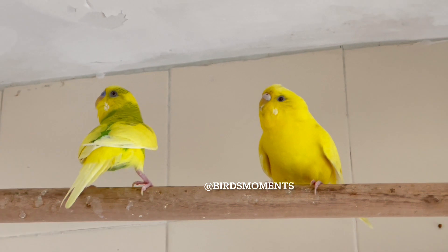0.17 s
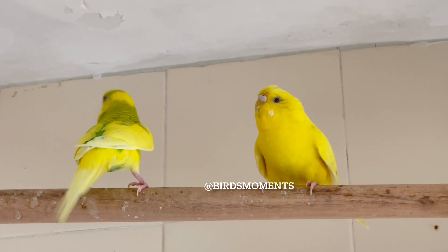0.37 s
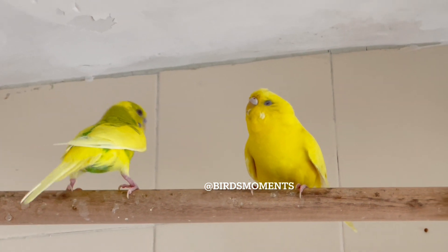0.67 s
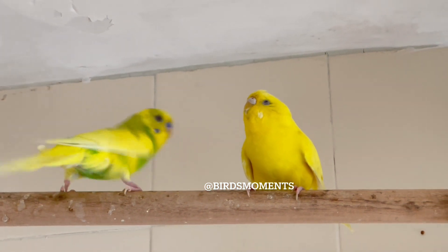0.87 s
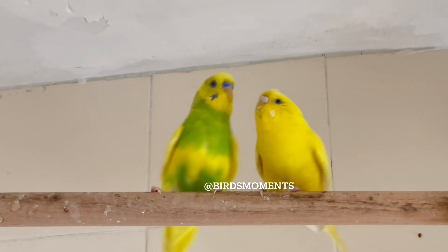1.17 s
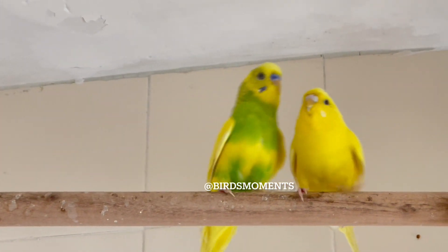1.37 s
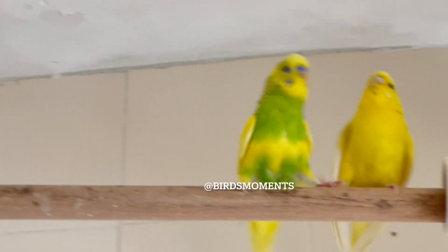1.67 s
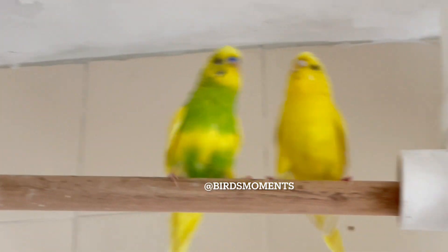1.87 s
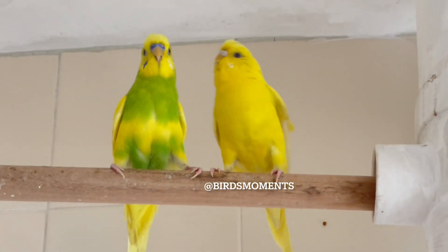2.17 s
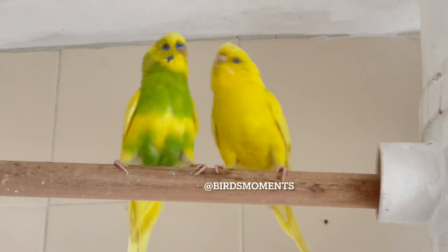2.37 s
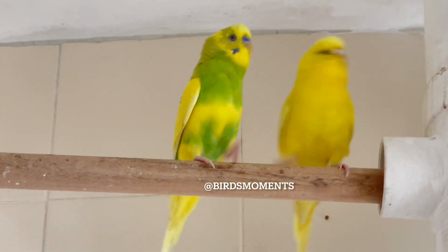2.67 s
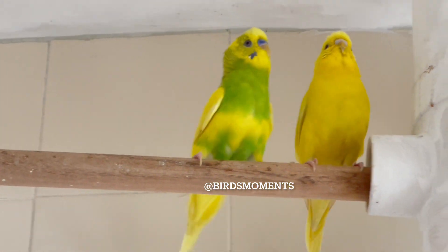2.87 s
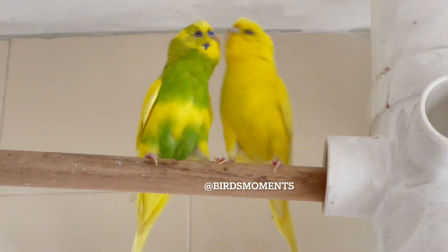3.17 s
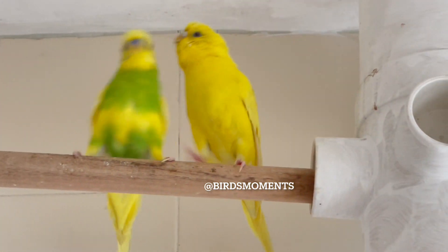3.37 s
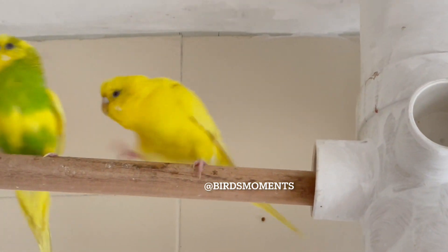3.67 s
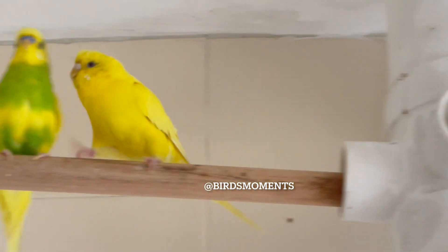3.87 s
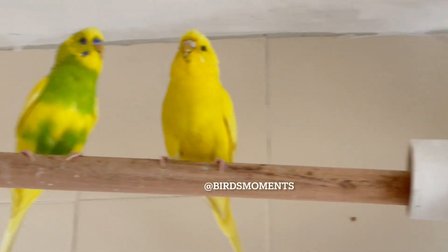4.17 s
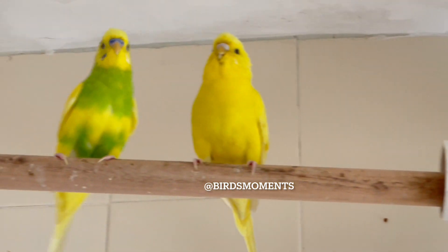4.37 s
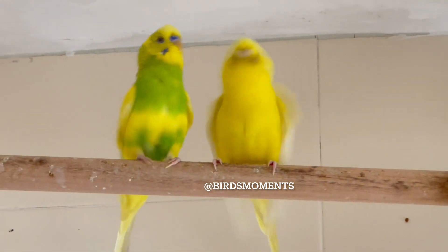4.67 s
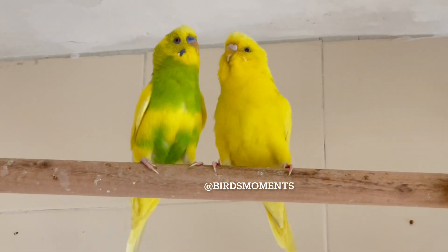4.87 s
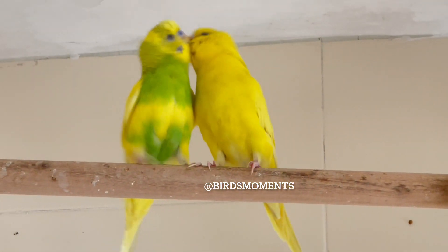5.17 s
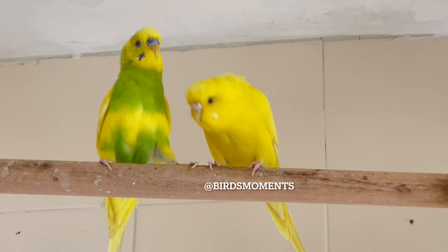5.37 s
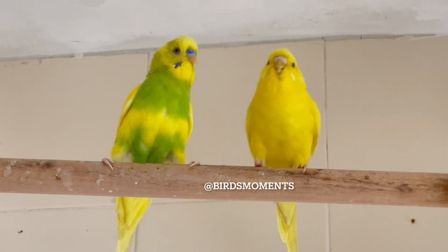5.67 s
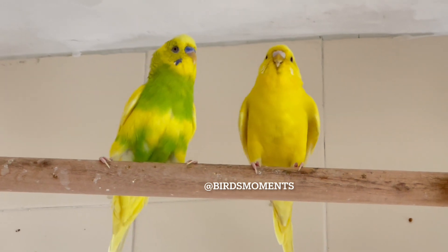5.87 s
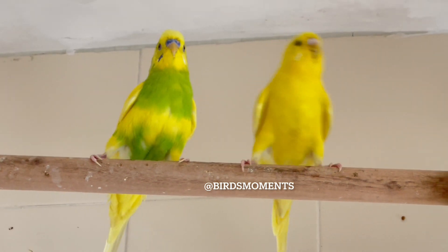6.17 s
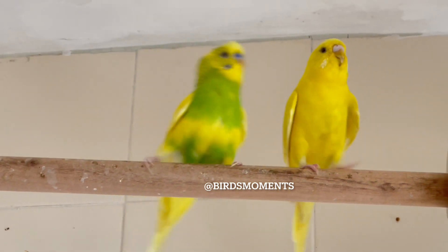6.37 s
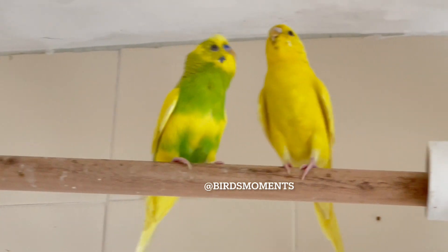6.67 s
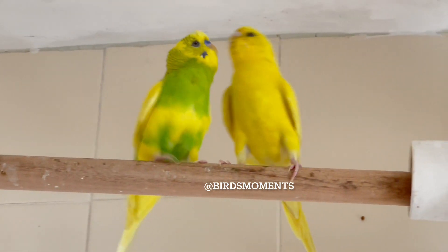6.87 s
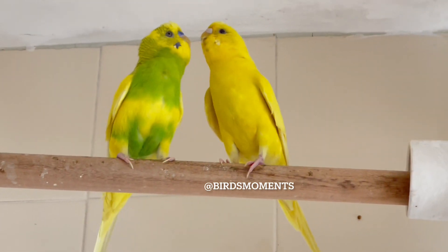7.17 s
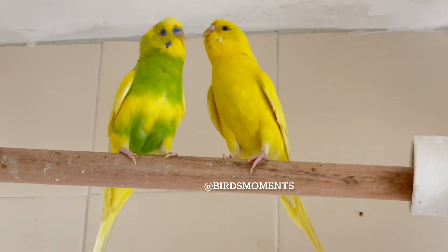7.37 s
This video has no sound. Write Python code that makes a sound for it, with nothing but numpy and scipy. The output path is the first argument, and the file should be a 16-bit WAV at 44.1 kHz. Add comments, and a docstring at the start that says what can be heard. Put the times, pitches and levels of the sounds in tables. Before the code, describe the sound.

Two budgies chatter close to the microphone in a bare, echoing tiled room, over soft room noise and a faint wavering low hum. From 0 to 0.85 s it is nearly silent, with barely perceptible distant chirping and warbling. From 0.9 to 1.5 s a run of dry, woody clucks comes about every tenth of a second. Around 1.55-1.95 s there is a low falling yelp, then quick chirps and a buzz. Harsh, pulsing squawks strike at 2.25 and 2.43 s. From 2.7 to 3.7 s tiny gliding chirps and clucks tumble quietly, with faint feather rustle. Brighter trills come at 3.8 s, a swooping nasal call at 4.0 s, and fast chatter at 4.35-5.0 s. The loudest, very short squawk hits at 5.1 s, echoed weakly at 5.2. After a pause, a cluck at 5.6, bright trilled chirps near 6.05, low husky warbling at 6.4-6.7, then scattered chirps and a buzz until 7.5 s.

```python
"""In a bare tiled room, two budgerigars chatter on a perch close to the microphones.
Chirps, yelps, trills, buzzes, drawls and warbles are partials that follow a gliding pitch, coloured by a throat.
Rasping squawks are such tones broken into pulses; clucks are short bursts ringing windpipe and beak.
Feathers rustle as shaped noise and feet knock a ringing perch. Dense wall reflections draw every note
into a tail, over a low wavering hum in soft room noise."""
import sys
import numpy as np
from scipy import signal
from scipy.fft import rfft, irfft, next_fast_len
from scipy.io import wavfile

SR = 44100
rng = np.random.default_rng(int(sys.argv[2]) if len(sys.argv) > 2 else 0)


def to_wav(sig):
    """Store sig (one row per channel, or 1-D mono) as 16-bit WAV at the path in sys.argv[1].

    Samples outside -1..1 are clipped; the rate is SR.
    """
    pcm = np.clip(np.atleast_2d(sig), -1, 1) * 32767
    pcm = np.round(pcm).astype(np.int16)
    wavfile.write(sys.argv[1], SR, pcm.T)  # frames by channels


N = 332073  # length in samples
EDGE_HZ = 15800  # upper band limit


def syrinx(hz, colour, slope_db, fall_db=3.0, count=10):
    """Harmonic source and filter: membranes give partials, the throat weights them; those past the third fade."""
    k = np.arange(1, count + 1)[:, None]
    weight_db = read(colour, k * hz) + slope_db * np.log2(k) - fall_db * np.maximum(k - 3, 0)
    audible = k * hz < EDGE_HZ
    phase = 2 * np.pi * np.cumsum(hz) / SR
    partials = gain_of(weight_db) * audible * np.sin(k * phase)
    return evened(partials.sum(0))


# A loud note, from which brightness is reckoned: pitch in Hz, level in dB.
REFERENCE_HZ, REFERENCE_DB = 2262, -23
# The overtone slope (dB per octave) falls per octave of pitch and rises per dB of level.
THINNING, BRIGHTEN = 2.9, 0.34
CLEAR = 0.11  # roughness of the clear notes (0-1)


def sing(hz, colour, level_db, rough, slope_db, jitter=0.093, quiver=0.026, shimmer=1.0,
         flutter_hz=560, air_db=-17, air_slope=0.29, taper=0.3):
    """Modulated phonation: roughness shakes pitch and strength; low, loud notes are brighter and airier."""
    size = len(hz)
    slope_db = slope_db - THINNING * np.log2(hz / REFERENCE_HZ) + BRIGHTEN * (level_db - REFERENCE_DB)
    hz = hz * np.exp((quiver + jitter * rough) * wander(flutter_hz, size))
    breath = gain_of(air_db + air_slope * slope_db) * hiss(colour, size)
    tone = syrinx(hz, colour, slope_db) + breath
    flutter = np.exp(shimmer * rough * np.tanh(wander(flutter_hz, size)))
    pressure = signal.windows.tukey(size, taper) * flutter
    return gain_of(level_db) * evened(tone * pressure)


SETTLE = 0.89  # time constant of a glide, as a share of the note's length


def slide(length, middle_hz, octaves):
    """Exponential relaxation of pitch: a short note slides fast at first, then more slowly."""
    way = np.exp(-np.linspace(0, 1, int(length * SR)) / SETTLE)
    travelled = (way[len(way) // 2] - way) / (1 - way[-1])
    return middle_hz * 2 ** (octaves * travelled)


# Resonance of the throat. Each row: frequency in Hz, gain in dB.
THROAT = [(400, -30), (1000, -11.5), (1600, -4.5), (2900, 3.5), (3800, -5), (4800, -7.5), (6300, -7.5),
          (8800, -3), (10200, -13.5), (12300, -16), (13600, -69)]
# Thin, nearly pure whistles; the rows at 6.953 and 6.956 are bright overtones of a yelp.
# Each row: start in seconds, length in seconds, pitch at the middle in Hz, glide in octaves, level in dB.
CHIRPS = [ (.298, 0.097, 4520, -.02, -78.5), (.465, 0.13, 2820, -0.076, -83),
          (1.842, 0.029, 3314, -0.27, -34.5), (1.868, 0.069, 2584, -0.13, -29.5),
          (2.67, .08, 1888, 0.17, -42.5), (2.818, 0.023, 1955, -.75, -32), (2.832, 0.011, 2785, -.4, -36),
          (2.961, 0.013, 3060, 0.64, -37.5), (3.04, 0.02, 3190, -.06, -36.5),
          (3.055, 0.028, 2250, -0.67, -39), (3.086, 0.021, 1392, 0.24, -43.5),
          (3.124, 0.013, 1380, 0.26, -43), (3.277, 0.037, 2130, -0.67, -37),
          (3.502, 0.041, 1858, 0.53, -39), (3.538, .022, 2524, -0.3, -38.5),
          (3.584, 0.025, 2950, .25, -35.5), (3.625, 0.033, 2570, -.44, -37), (3.671, 0.016, 1870, -.9, -35),
          (3.802, 0.016, 3195, 0.33, -21.5), (4.381, 0.032, 1930, 0.34, -39),
          (4.44, .026, 1972, -0.12, -36.5), (4.594, 0.023, 2664, 0.091, -31),
          (4.817, 0.011, 3770, -0.44, -39), (4.826, 0.02, 2286, 0.35, -37.5),
          (4.84, 0.013, 1992, -0.4, -37.5), (4.853, 0.05, 2475, -0.5, -32.5), (4.897, 0.025, 3263, .6, -29),
          (4.925, 0.021, 3068, -0.049, -23.5), (4.964, .035, 2626, -.05, -30),
          (4.987, .023, 1830, -0.4, -35.5), (5.814, 0.021, 3096, 0.16, -36.5),
          (5.902, .018, 2112, -0.323, -39.5), (5.939, 0.011, 1480, -0.41, -41.5),
          (6.022, 0.0344, 2850, -0.25, -27.5), (6.129, 0.013, 3410, .03, -31.5),
          (6.809, 0.013, 3625, -0.46, -39), (6.855, 0.026, 2510, -0.41, -39.5),
          (6.901, .021, 3354, -.25, -36.5), (6.953, 0.011, 4214, -0.24, -33),
          (6.956, 0.0113, 6240, -0.16, -38.5), (7.383, 0.015, 3430, 0.31, -38.5),
          (7.403, .034, 1713, -0.84, -38.5), (7.43, 0.048, 2436, 0.04, -39)]


def chirp(length, hz, octaves, level_db):
    """Steep spectral slope: with weak overtones, the note is a clean whistle."""
    return sing(slide(length, hz, octaves), THROAT, level_db, rough=CLEAR, slope_db=-13.0)


# Colour of the throat in nasal notes. Each row: frequency in Hz, gain in dB.
NASAL = [(400, -23.5), (1000, -9), (1600, -8), (2200, -3), (3000, 6.5), (3800, 3), (4800, -11.5),
         (6300, -9.5), (8800, -2.5), (12300, -15.5), (13600, -69)]
# Nasal notes. Each row: start in seconds, length in seconds, pitch at the middle in Hz,
# glide in octaves, level in dB.
YELPS = [ (1.549, .075, 1138, -.62, -36), (1.782, 0.022, 1428, -0.43, -37), (2.797, 0.026, 2726, 0.35, -31),
         (3.742, 0.021, 1910, 0.21, -32.5), (4.347, 0.025, 1541, -.15, -42.5),
         (6.001, 0.016, 1895, -.14, -38.5), (6.06, 0.0072, 1860, -0.115, -25.5),
         (6.924, 0.018, 2575, -0.074, -36), (6.949, 0.02, 2110, -.2, -39.5)]


def yelp(length, hz, octaves, level_db):
    """Gentle spectral slope: with strong overtones, the note is nasal."""
    return sing(slide(length, hz, octaves), NASAL, level_db, rough=CLEAR, slope_db=-4)


# Trilled notes. Each row: start in seconds, length in seconds, pitch at the middle in Hz,
# glide in octaves, level in dB.
TRILLS = [(3.763, 0.036, 2784, 0.036, -25), (3.827, 0.081, 2714, -0.13, -27.5),
          (5.753, 0.058, 1887, 0.25, -41.5), (5.842, 0.048, 2885, 0.085, -38),
          (6.069, .056, 2920, .05, -23), (6.786, 0.052, 1762, 0.41, -45)]
TRILL_PER_S = 100  # mean number of swings a second


def trill(length, hz, octaves, level_db, sweep=0.11, throb=0.66, unsteady=0.17):
    """Joint frequency and amplitude modulation: a whistle swings quickly, loudest at the foot of each swing."""
    pitch = slide(length, hz, octaves)
    rate = TRILL_PER_S * (1 + unsteady * wander(TRILL_PER_S, len(pitch)))
    swing = -np.sin(2 * np.pi * np.cumsum(rate) / SR)
    note = sing(pitch * 2 ** (sweep * swing), THROAT, level_db, rough=0.327, slope_db=-11.0)
    return note * evened(np.exp(-throb * swing))


# Hoarse notes. Each row: start in seconds, length in seconds, pitch at the middle in Hz,
# glide in octaves, level in dB.
BUZZES = [ (1.797, 0.052, 2244, -0.49, -36), (1.915, 0.047, 1292, 0.17, -44.5),
          (2.849, 0.036, 1950, -.3, -33.5), (3.14, 0.062, 1847, -0.093, -40),
          (4.104, .013, 3800, 0.11, -25.5), (7.101, 0.043, 3878, 0.041, -30)]


def buzz(length, hz, octaves, level_db):
    """Random frequency modulation: a whistle shaken so hard that it smears into a band."""
    return sing(slide(length, hz, octaves), THROAT, level_db, rough=0.707, slope_db=-11.0)


# Longer nasal calls, one list of points a call. Each row: time in seconds, pitch in Hz,
# level in dB before the common trim.
DRAWLS = [
    [(4.004, 1749, -21.5), (4.02, 1977, -20.5), (4.024, 1848, -21.5), (4.038, 1432, -27),
     (4.052, 1537, -24), (4.064, 1932, -33), (4.068, 1943, -24.5), (4.098, 2413, -25.5), (4.118, 2270, -30),
     (4.13, 2310, -20)],
    [(4.482, 990, -28.5), (4.492, 1130, -27.5), (4.511, 1247, -28), (4.518, 1518, -28),
     (4.545, 1402, -29.5)],
    [(4.592, 1345, -33), (4.614, 1362, -40), (4.626, 1675, -32), (4.65, 1451, -32), (4.68, 1384, -32.5)],
]


def drawls(trim_db=-3):
    """Continuous pitch and level contours: long nasal calls swoop along curves of their own."""
    track = np.zeros(N)
    for curve in DRAWLS:
        s, hz, db = np.transpose(curve)
        t = np.arange(s[0], s[-1], 1 / SR)
        pitch = np.interp(t, s, hz)
        level_db = np.interp(t, s, db) + trim_db
        add(track, s[0], sing(pitch, NASAL, level_db, rough=CLEAR, slope_db=-4.0, taper=0.1))
    return track


# Stretches of soft, low warbling. Each row: start in seconds, end in seconds, central pitch in Hz,
# central level in dB, overtone slope in dB per octave for that loud reference note.
WARBLES = [(0.253, .8, 1200, -69.5, -18), (6.426, 6.72, 1166, -49, -5.5)]
WARBLE_PER_S, WARBLE_NOTE_S = 20, 0.0328  # mean pace and length of its notes
WARBLE_SPREAD, WARBLE_GLIDE = 0.0788, 0.306  # scatter of their pitch and glide, octaves


def warble(unsteady=0.17, uneven_db=1.5):
    """Random note sequence: husky little notes at a loose pace, with chance pitch, glide and strength."""
    track = np.zeros(N)
    for start, end, hz, level_db, slope_db in WARBLES:
        for s in np.arange(start, end, 1 / WARBLE_PER_S):
            late, shift, glide, effort = rng.standard_normal(4)
            pitch = slide(WARBLE_NOTE_S, hz * 2 ** (WARBLE_SPREAD * shift), WARBLE_GLIDE * glide)
            note = sing(pitch, THROAT, level_db + uneven_db * effort, rough=0.34, slope_db=slope_db)
            add(track, s + unsteady * late / WARBLE_PER_S, note)
    return track


# Colour of the wide-open beak. Each row: frequency in Hz, gain in dB.
GAPE = [(500, -50), (1050, -34), (1450, -14.5), (3000, -7), (4500, -4), (6100, 0.5), (7800, -3),
        (9200, -4.5), (12200, -17.5), (13700, -46.5)]
# Rasping squawks, loud to faint, one with a weaker repeat just after it. Each row: start in seconds,
# length in seconds, pitch at the start in Hz, pitch it tends to in Hz, level in dB,
# rasp pulses a second before they quicken.
SQUAWKS = [(2.248, 0.1, 2665, 2922, -22.5, 200.8), (2.428, 0.069, 2752, 3310, -19.5, 209.5),
           (5.094, 0.029, 2826, 3203, -14, 222.4), (5.19, 0.024, 3007, 3233, -24, 225),
           (7.089, 0.061, 4070, 4150, -45.5, 203)]


def squawk(length, start_hz, top_hz, level_db, pulse_hz, sweep=0.0762, jitter=0.0616, throb=0.77,
           quicken=0.501, air_db=-2, settle=0.2, swell=0.44):
    """Pulsed phonation: quickening pulses merge as they bend the pitch and throb both tone and air."""
    u = np.linspace(0, 1, int(length * SR))
    size = len(u)
    rate = pulse_hz * (1 + quicken * u + 0.22 * wander(pulse_hz, size))
    beat = 2 * np.pi * np.cumsum(rate) / SR
    shake = jitter * wander(680, size) + sweep * np.sin(beat)
    hz = (top_hz + (start_hz - top_hz) * np.exp(-u / settle)) * np.exp(shake)
    onset = np.sin(np.pi / 2 * np.minimum(u / swell, 1))
    pulses = np.exp(-throb * (1 - u) * np.cos(beat))  # shallower towards the end
    pressure = onset * signal.windows.tukey(size, 0.2) * pulses
    tone = syrinx(hz, GAPE, 0) + gain_of(air_db) * hiss(GAPE, size)
    return gain_of(level_db) * evened(tone * pressure)


# Broad colour of a cluck. Each row: frequency in Hz, gain in dB.
BEAK = [(300, -39), (800, -14), (1500, -6), (3200, 3.5), (4600, -1), (6300, 3), (9000, 2), (12300, -7),
        (13600, -59)]
# Short clucks ringing in the room. Each row: start in seconds, level in dB, decay in seconds,
# low resonance in Hz, beak resonance in Hz.
CLUCKS = [ (.886, -38.5, 0.0066, 1258, 1740), (0.979, -30, 0.017, 1370, 2570),
          (1.104, -31, 0.0051, 959, 3760), (1.162, -30, 0.014, 992, 3050),
          (1.236, -26.5, 0.0055, 1056, 3110), (1.283, -28.5, 0.011, 808, 3080),
          (1.359, -28.5, 0.0089, 835, 3400), (1.418, -29, .013, 824, 3350),
          (1.494, -26, 0.0045, 1489, 3000), (2.728, -35.5, 0.0057, 807, 2010),
          (2.953, -35, 0.0084, 1897, 3530), (3.205, -42, 0.025, 1009, 1920),
          (5.561, -27.5, 0.0037, 1172, 4000), (6.363, -36.5, 0.014, 1054, 1587),
          (6.475, -45.5, 0.017, 824, 2300), (6.62, -40, 0.0079, 1102, 1860),
          (6.727, -41.5, 0.0056, 1098, 1730)]
# Treble slope (dB per octave) at full level (dB), and its rise per dB of level.
CLUCK_SLOPE_DB, CLUCK_FULL_DB, CLUCK_BRIGHTEN = -1, -23, 0.38
CLUCK_VOICE_DB, CLUCK_LIFT = -7, 0.25  # voiced part against the air (dB), its rise in log pitch
PIPE_DB, BEAK_DB = 6, 6  # heights of the first windpipe and the beak resonance


def cluck(level_db, decay, low_hz, beak_hz, width_hz=130, beak_width_hz=240, rise=0.52, grain=0.44, size=8192):
    """Excited resonance: rising pulses and grainy air ring windpipe and beak; harder clucks are brighter."""
    t, f = np.arange(size) / SR, np.fft.rfftfreq(size, 1 / SR)
    puff = (1 - np.exp(-t / (rise * decay))) * np.exp(-(t / decay) ** 2 / 2)
    turns = np.cumsum(low_hz * np.exp(CLUCK_LIFT * np.tanh(t / decay - 1 / 2))) / SR
    pulses = evened(sum(np.cos(2 * np.pi * k * turns) for k in range(1, 6)))
    source = evened(gain_of(CLUCK_VOICE_DB) * pulses + rng.standard_normal(size))
    burst = puff * source * np.exp(grain * wander(600, size))

    slope_db = CLUCK_SLOPE_DB + CLUCK_BRIGHTEN * (level_db - CLUCK_FULL_DB)
    tilt_db = slope_db * np.log2((f + 100) / 3000)
    pipe_db = sum(PIPE_DB / np.sqrt(k) / (1 + ((f - k * low_hz) / width_hz) ** 2) for k in range(1, 4))
    beak_db = BEAK_DB / (1 + ((f - beak_hz) / beak_width_hz) ** 2)
    colour = evened(gain_of(read(BEAK, f) + tilt_db + pipe_db + beak_db))
    # minimum phase: the resonances ring on after the burst, never before it
    log_colour = np.log(np.r_[colour, colour[-2:0:-1]])
    causal = np.exp(signal.hilbert(log_colour).conj())[:len(f)]
    return gain_of(level_db) * irfft(rfft(burst) * causal)


# Colour of the feathers. Each row: frequency in Hz, gain in dB.
FEATHERS = [(600, -12), (2500, -3), (6500, -0.5), (9000, -4), (12300, -9.5), (13600, -59)]
# Rustles as the birds shuffle along the perch. Each row: start in seconds, length in seconds, level in dB.
RUSTLES = [(0.845, 0.077, -58.5), (1.582, 0.16, -55), (3.196, 0.2, -59.5), (3.406, 0.2, -62.5)]


def rustle(length, level_db, grain=0.8, grain_hz=150):
    """Friction noise: feathers brush past each other in one uneven swell of hiss."""
    size = int(length * SR)
    swell = signal.windows.tukey(size, 0.7) * np.exp(grain * wander(grain_hz, size))
    return gain_of(level_db) * evened(hiss(FEATHERS, size) * swell)


# Soft knocks as feet shift on the perch. Each row: start in seconds, level in dB.
STEPS = [(7.097, -52), (7.143, -46.5)]
PERCH_HZ, PERCH_T60 = 364, 0.2  # mean pitch of the perch, and its time (s) to fall 60 dB


def step(level_db, size=12000):
    """Damped free vibration: a foot lands and the perch gives a dull, quickly dying knock."""
    t = np.arange(size) / SR
    hz = PERCH_HZ * (1 + 0.081 * wander(125, size))
    ring = np.sin(2 * np.pi * np.cumsum(hz) / SR)
    return gain_of(level_db - 60 * t / PERCH_T60) * ring


# Reverberation of the tiled room. Each row: frequency in Hz, time to fall 60 dB in seconds.
ROOM_T60 = [(500, 0.13), (1200, 1), (2700, 0.62), (7000, 0.59), (12000, 0.44)]


def tail(build=0.0012, early=0.2, early_s=0.041, size=44100):
    """Diffuse reverberation: dense reflections of random sign, stronger early; each band dies at its speed."""
    taps = rng.choice([-1., 1.], size) * (rng.random(size) < 0.1)
    hz, t, z = signal.stft(taps, SR)
    decay = gain_of(-60 * t / read(ROOM_T60, hz)[:, None])
    ring = signal.istft(z * decay, SR)[1][:size]
    t = np.arange(size) / SR
    ring = ring * (1 - np.exp(-t / build)) * (1 + early * np.exp(-t / early_s))
    return ring / np.linalg.norm(ring)


# Stereo width of the reverberation. Each row: frequency in Hz, side over mid in dB.
ROOM_WIDTH = [(1200, 0), (2300, -11.5), (12000, -55)]


def room(x, wet_db):
    """Convolution with a room response: only its lower tones differ much between the ears."""
    mid = x + gain_of(wet_db) * signal.fftconvolve(x, tail())[:N]
    side = gain_of(wet_db) * signal.fftconvolve(x, coloured(tail(), ROOM_WIDTH))[:N]
    return np.array([mid + side, mid - side])


# Lines of the hum. Each row: mean frequency in Hz, level in dB (HUM_SWELL replaces the first row's level).
HUM = [(64.6, -56), (199.2, -62)]
# Swell of the lowest line. Each row: time in seconds, level in dB before the drone trim.
HUM_SWELL = [(0.0, -45), (3.331, -58), (4.23, -44.5), (4.32, -50.5), (5.33, -55.5), (5.66, -45.5),
             (7.53, -52.5)]
# Spectrum of the room noise. Each row: frequency in Hz, relative density in dB.
AIR = [(20, -23), (38, -8.5), (60, 0.5), (130, -3.5), (250, -7), (500, -10), (1200, -17), (2000, -27),
       (4500, -36), (5600, -41.5), (16000, -57)]
AIR_DB = -57  # level of the mid part of the room noise
# Stereo width of the room noise. Each row: frequency in Hz, side over mid in dB.
AIR_WIDTH = [(50, -2.5), (120, -9), (700, -4)]


def background(drone_db=-2.5, waver=0.53, drift_hz=4):
    """Narrow-band tones in broadband noise: a wavering low hum with a higher line, in soft room noise."""
    swell_db = np.interp(np.arange(N) / SR, *np.transpose(HUM_SWELL)) + drone_db
    levels_db = [swell_db] + [db for _, db in HUM[1:]]
    hum = 0
    for (hz, _), db in zip(HUM, levels_db):
        turns = np.cumsum(hz + drift_hz * wander(7.08, N)) / SR
        line = np.sin(2 * np.pi * turns) * (1 + waver * wander(4.5, N))
        hum = hum + gain_of(db) * evened(line)
    mid, side = hiss(AIR, N), coloured(hiss(AIR, N), AIR_WIDTH)
    return hum + gain_of(AIR_DB) * np.array([mid + side, mid - side])


def gain_of(db):
    """Logarithmic level: decibels become an amplitude factor."""
    return 10 ** (np.asarray(db) / 20)


def evened(x):
    """Normalisation: scales to an rms of one."""
    return x / np.sqrt(np.mean(x ** 2) + 1e-20)


def read(points, hz):
    """Logarithmic frequency scale: interpolates a table of (Hz, value)."""
    f, value = np.transpose(points)
    return np.interp(np.log(hz + 1), np.log(f + 1), value)


def coloured(x, points):
    """Linear filtering: weights the spectrum by a table of (Hz, dB)."""
    f = np.fft.rfftfreq(len(x), 1 / SR)
    return irfft(rfft(x) * gain_of(read(points, f)), len(x))


def hiss(colour, size):
    """Filtered noise: a random sound with the given spectrum, scaled to an rms of one before trimming."""
    noise = rng.standard_normal(next_fast_len(size, True))
    return evened(coloured(noise, colour))[:size]


def wander(hz, size):
    """Low-passed noise: smooth chance with an rms of one, falling off steeply above hz."""
    long = next_fast_len(size + SR // 10, True)
    f = np.fft.rfftfreq(long, 1 / SR)
    spectrum = rfft(rng.standard_normal(long)) / np.sqrt(1 + (f / hz) ** 6)
    return evened(irfft(spectrum, long)[:size])


def add(mix, s, sound):
    """Superposition: adds a sound to the mix at a time in seconds."""
    part = mix[round(s * SR):][:len(sound)]
    part += sound[:len(part)]


def play(voice, table):
    """Superposition of events: sounds every row of a table at its start."""
    track = np.zeros(N)
    for s, *row in table:
        add(track, s, voice(*row))
    return track


def scene():
    """Linear superposition: song, squawks, clucks, feathers and feet in the room, over the hum."""
    song = play(chirp, CHIRPS) + play(yelp, YELPS) + play(trill, TRILLS) + play(buzz, BUZZES)
    song = song + drawls() + warble()
    notes = room(song, wet_db=2.0)
    squawks = room(play(squawk, SQUAWKS), wet_db=-1.0)
    short_sounds = play(cluck, CLUCKS) + play(rustle, RUSTLES) + play(step, STEPS)
    return notes + squawks + room(short_sounds, wet_db=3.0) + background()


# Phase between the microphone ports. Each row: frequency in Hz, lead of the left port in radians.
PORT_PHASE = [(1900, 0), (3200, 0.8), (7800, 0), (8900, 1.24), (9500, -2.5), (10300, -2.5), (11800, -8.5),
              (12600, -8.5)]
# Response of the microphones. Each row: frequency in Hz, gain in dB.
MICROPHONE = [(13000, -1), (13600, -17)]
CEILING = 0.65  # peaks are rounded off near this share of full scale


def record(dry):
    """Interchannel phase and saturation: treble out of step, a dull top, soft overload, then a band limit."""
    size = next_fast_len(N + 2048, True)
    f = np.fft.rfftfreq(size, 1 / SR)
    phase = np.interp(f, *np.transpose(PORT_PHASE))
    turn = np.exp(0.5j * np.array([phase, -phase]))  # half the lead to each port
    spectrum = rfft(dry, size) * gain_of(read(MICROPHONE, f)) * turn
    ports = irfft(spectrum, size)[:, :N]
    ports = ports / (1 + (ports / CEILING) ** 6) ** (1 / 6)
    band_limit = signal.firwin(511, EDGE_HZ, window=("kaiser", 9), fs=SR)
    return signal.oaconvolve(ports, band_limit[None], "same")


dry = scene()
out = record(dry)
to_wav(out)
```